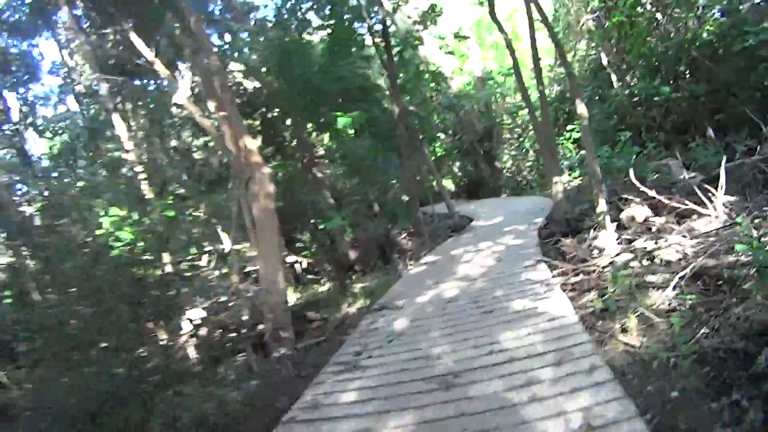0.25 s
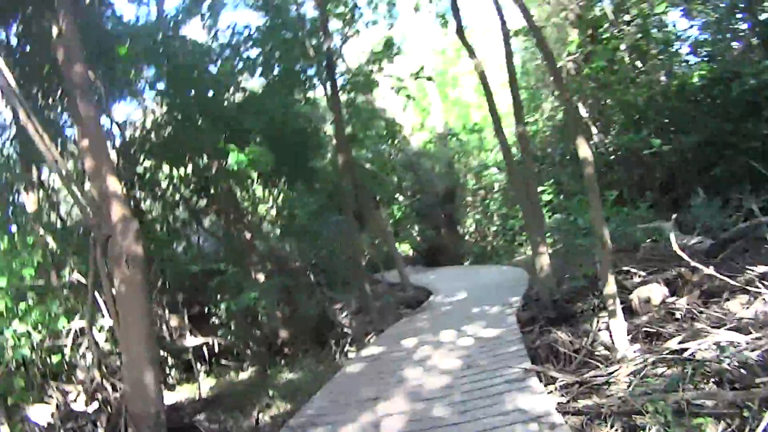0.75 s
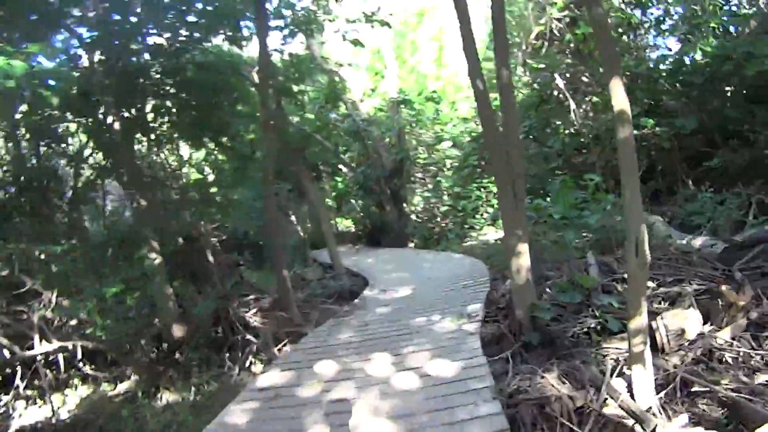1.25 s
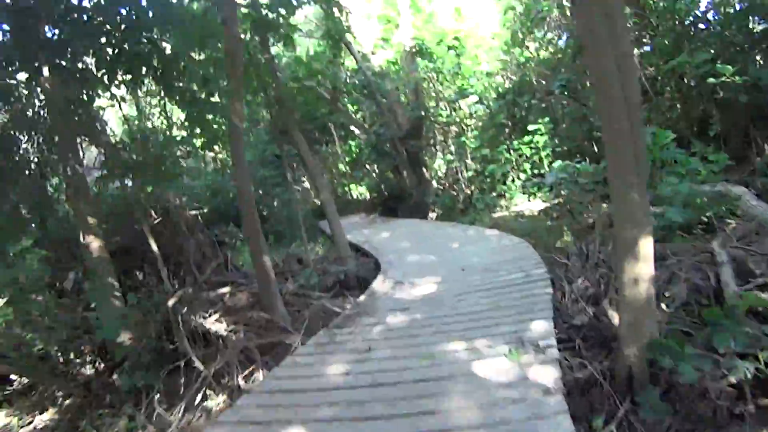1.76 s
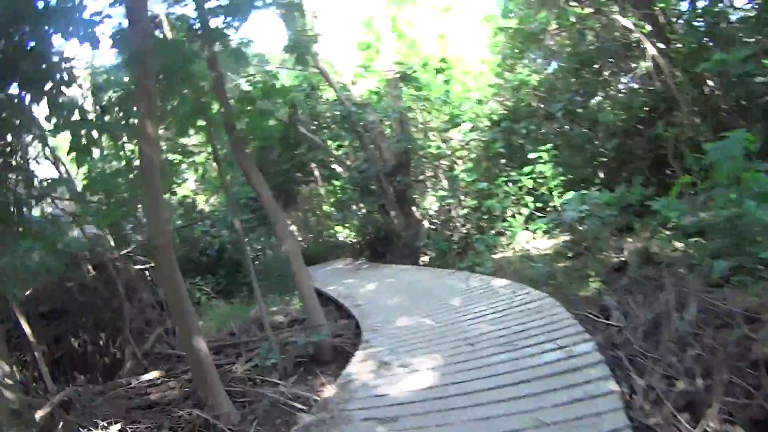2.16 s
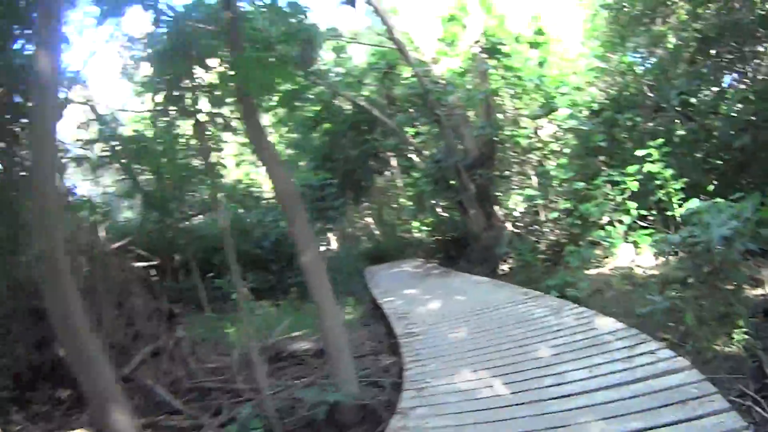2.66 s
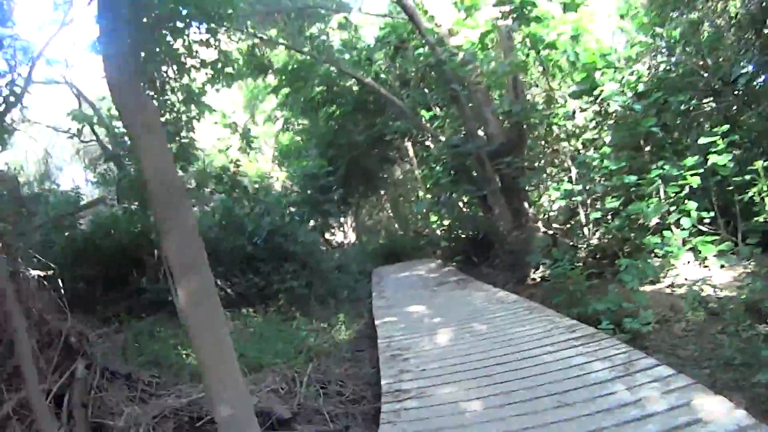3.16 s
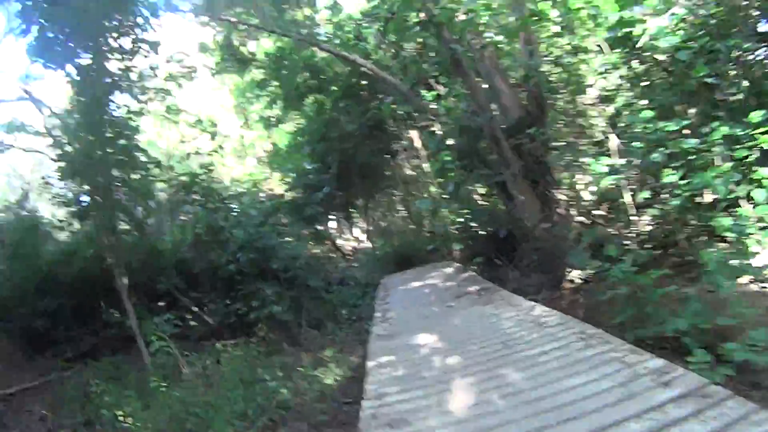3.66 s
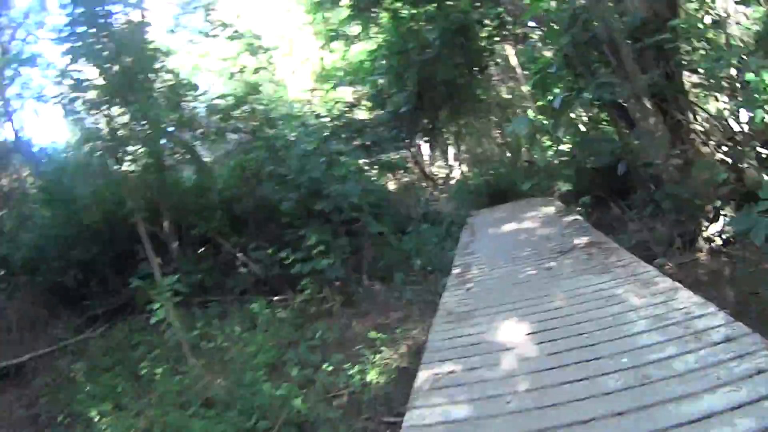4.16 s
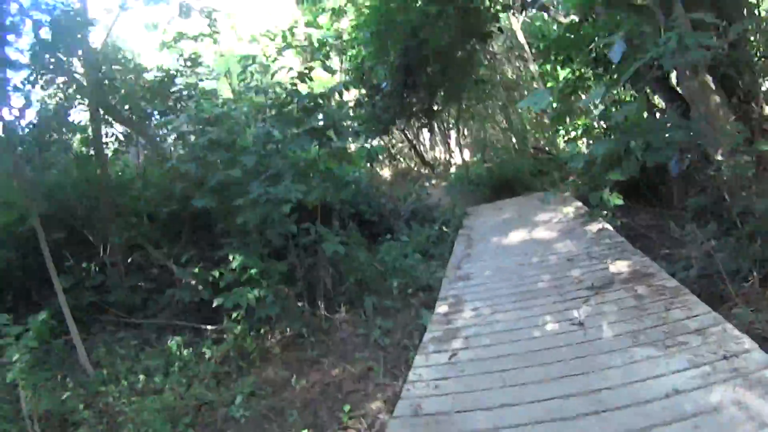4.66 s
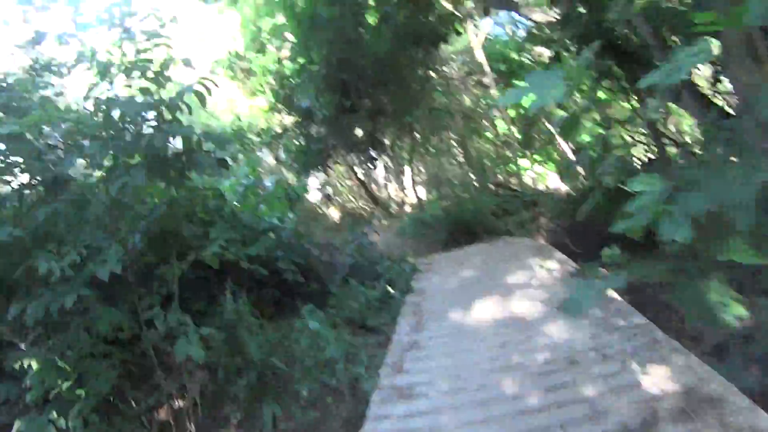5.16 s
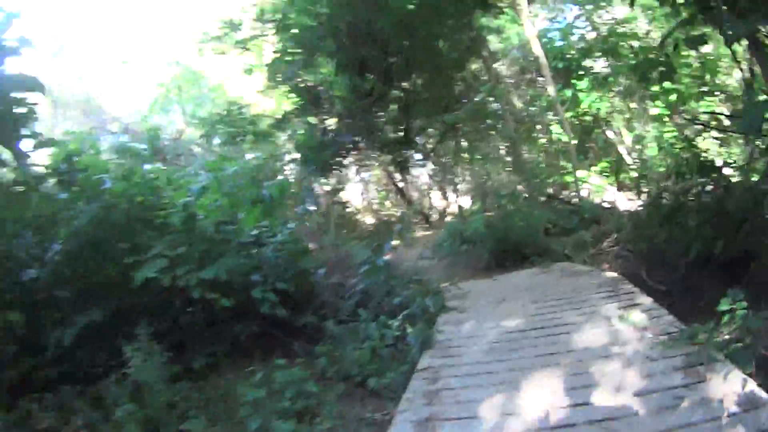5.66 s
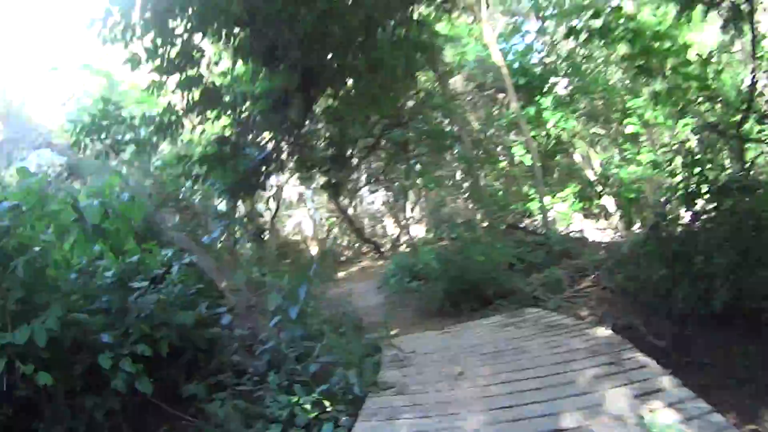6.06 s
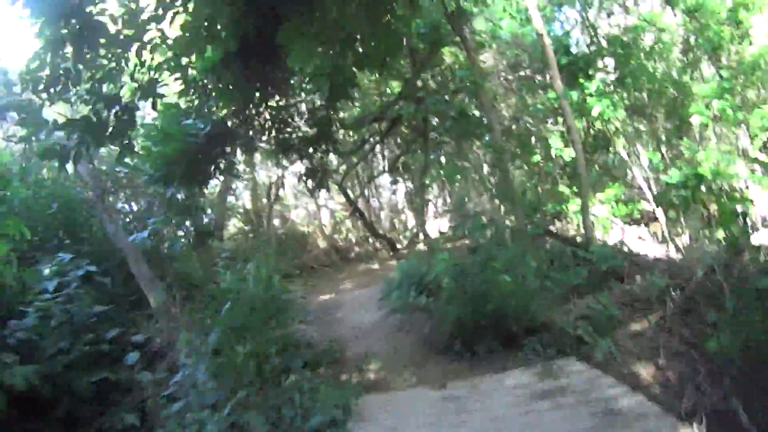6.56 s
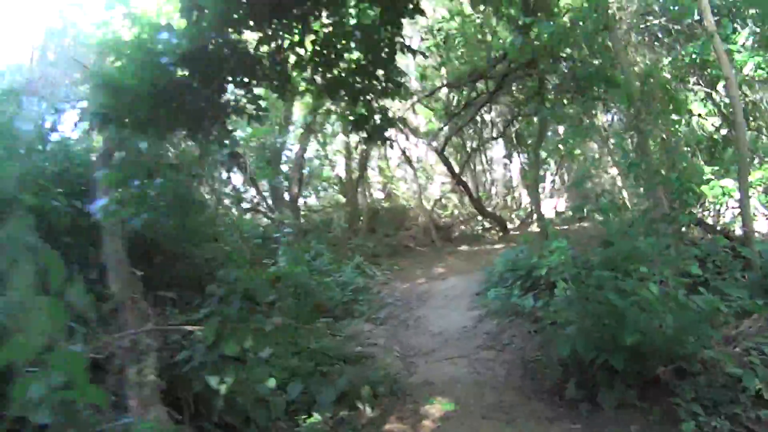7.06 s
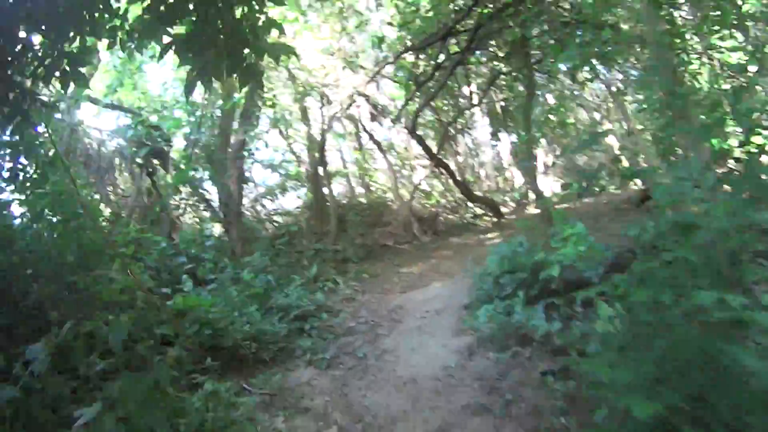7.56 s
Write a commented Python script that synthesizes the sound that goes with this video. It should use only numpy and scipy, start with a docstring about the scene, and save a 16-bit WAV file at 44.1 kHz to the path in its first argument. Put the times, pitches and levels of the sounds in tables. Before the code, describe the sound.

Microphones carried by a runner on a plank path in the woods catch quick, irregular dry knocks, soft low thuds and small clicks. Air rumbles gently, leaves hiss faintly, and distant birds twitter throughout. One loud crack strikes just before four and a half seconds; then a nearer bird whistles short slurred notes between about five and seven seconds as the footfalls continue.

```python
"""A plank walk through a wood, heard by a runner carrying microphones: struck modes make dry knocks of wood and
gear, single swings make small clicks and dull footfall thuds, short tones with noise make sharp ticks.
Shaped noise gives low buffeting of air, a faint hiss of leaves and swishes of clothing.
Gliding sines give one near bird's slurred whistles and farther birds; echoes blur others into a chorus."""
import sys
import numpy as np
from scipy import signal
from scipy.fft import rfft, irfft, next_fast_len
from scipy.io import wavfile
from scipy.ndimage import uniform_filter1d, map_coordinates

SR = 44100
rng = np.random.default_rng(int(sys.argv[2]) if len(sys.argv) > 2 else 0)


def file_out(sig):
    """Save sig as 16-bit WAV at sys.argv[1]."""
    # one column per channel
    cols = np.atleast_2d(sig).T
    # limit, then scale
    lim = np.clip(cols, -1, 1)
    pcm = np.round(lim * 32767).astype(np.int16)
    wavfile.write(sys.argv[1], SR, pcm)


N = 344641

# buffeting of air [t/s, relative level/dB]
BUFFET_LEVEL = [(0.0, -43.5), (0.85, -47), (0.96, -42.5), (2.33, -42.5), (2.48, -47.5), (2.61, -38),
                (2.85, -46.5), (3.02, -43), (3.78, -50), (4.18, -41), (4.2, -55), (4.65, -46), (4.98, -42),
                (5.0, -48.5), (5.29, -42.5), (5.44, -47.5), (5.79, -41), (5.83, -48), (6.11, -42.5),
                (6.15, -44.5), (6.24, -46), (6.65, -41.5), (7.64, -48.5), (7.81, -42.5)]
# buffeting spectrum [f/Hz, relative density/dB per Hz]
BUFFET_SPECTRUM = [(7.1, 9.5), (12, 3.5), (45, -0.5), (119, -10), (308, -25), (500, -31), (650, -36),
                   (1100, -120)]
# leaf hiss spectrum [f/Hz, relative density/dB per Hz]
LEAF_SPECTRUM = [(150, -4), (400, 5.5), (1000, 7), (1800, 6), (3500, -8), (6000, 4), (8000, -0.5),
                 (9000, -10), (9700, -3), (11200, -9.5)]
# leaf hiss, left-right likeness [f/Hz, correlation]
LEAF_LIKENESS = [(60, 0.95), (140, 0.79), (350, 0), (830, -0.0), (1990, 0), (4770, 0.65), (11400, 0.41)]
# distant birds [t/s, relative level/dB]
CHORUS_LEVEL = [(0.0, -45), (0.65, -47), (0.96, -41.5), (1.17, -46.5), (2.2, -46.5), (2.61, -41),
                (2.78, -46.5), (3.22, -46.5), (3.44, -43.5), (4.18, -47), (5.0, -45), (5.55, -43),
                (5.68, -36.5), (5.98, -43), (6.61, -38), (6.76, -43.5), (7.09, -43.5), (7.24, -48.5),
                (7.64, -43.5), (7.81, -43.5)]
# distant birds' spectrum [f/Hz, relative density/dB per Hz]
CHORUS_SPECTRUM = [(1750, -61.5), (2000, -11), (2250, -5.5), (2500, 3.5), (2900, 1), (3300, -1),
                   (5000, -5.5), (5500, -10.5), (6300, -13.5), (8000, -17.5), (11000, -27)]
# echo decay among the trunks [f/Hz, t60/s]
ECHO_DECAY = [(300, 0.085), (1500, 0.077), (3000, 0.378), (5000, 0.41), (9000, 0.2)]
# farther birds [t/s, length/s, first f/Hz, last f/Hz, relative level/dB, warble depth/Hz]
FAR_NOTES = [(0.009, 0.0302, 2724, 2710, -45, 114), (0.583, 0.12, 5128, 5260, -45, 54),
             (0.605, 0.183, 2400, 2410, -46, 163), (0.708, 0.078, 3720, 3751, -49, 70),
             (0.875, 0.14, 2340, 2375, -46.5, 74), (.93, 0.0606, 3860, 3910, -45, 10),
             (1.06, 0.067, 3920, 3430, -46, 15), (1.344, .13, 3300, 3200, -48.5, 34),
             (1.403, 0.16, 2700, 2770, -45, 130), (1.434, 0.056, 4590, 4790, -43.5, 280),
             (1.578, 0.1145, 4250, 4408, -47, 190), (1.606, 0.139, 3910, 3124, -47.5, 20),
             (1.765, 0.08, 4150, 4400, -43, 150), (1.799, 0.109, 4050, 3879, -46.5, 34),
             (1.94, 0.11, 4080, 4240, -43, 118), (2.126, 0.09, 4000, 4326, -42.5, 115),
             (2.351, .1, 4014, 3405, -45.5, 185), (2.403, 0.1825, 2840, 2680, -44.5, 183),
             (2.674, 0.09, 3250, 2750, -40, 192), (2.814, 0.13, 3150, 2700, -42, 210),
             (2.998, .08, 6300, 6000, -52, 470), (3.159, 0.16, 3111, 2670, -46, 225),
             (3.428, 0.114, 4800, 4680, -53, 220), (3.619, 0.16, 7440, 7360, -56, 410),
             (4.05, 0.298, 2945, 2744, -47, 244), (4.36, 0.083, 2400, 2394, -48, 81),
             (4.535, 0.0434, 2950, 3230, -45, 11), (4.591, 0.053, 3300, 3064, -39, 10),
             (4.579, 0.143, 4850, 4677, -50.5, 254), (4.698, 0.074, 8200, 8250, -55.5, 130),
             (4.722, 0.063, 7150, 7250, -54, 130), (4.728, 0.0397, 4400, 4270, -44.5, 120),
             (4.756, 0.0932, 3677, 3690, -47.5, 24), (4.872, 0.0176, 3280, 3250, -39, 30),
             (4.994, 0.088, 5177, 4970, -48, 112), (5.033, 0.058, 3910, 3860, -44.5, 74),
             (5.215, 0.029, 2483, 3293, -42, 20), (5.238, .06, 3230, 3320, -52, 20),
             (5.484, 0.06, 2630, 2629, -36.5, 134), (6.072, 0.0165, 3660, 3204, -34, 22.6),
             (5.288, 0.0707, 2495, 2358, -45.5, 27), (6.89, 0.1, 5500, 4990, -47, 360),
             (6.947, 0.086, 4245, 4301, -44, 141), (7.434, 0.134, 7700, 7700, -51, 132),
             (7.446, 0.129, 6930, 6850, -50.5, 630), (7.444, 0.1367, 4210, 3588, -44.5, 224),
             (7.494, 0.1365, 3016, 2805, -40, 276)]
# knocks [t/s, relative level/dB, landing place/dB from hollow modes to middle one, hardness/dB per octave]
KNOCK_BLOWS = [(0.029, -48, 3.5, 10), (0.113, -45, 3.5, 5.5), (0.1371, -41.5, 0.5, 10.5),
               (0.2949, -35, -0.5, 7.5), (0.3084, -42.5, 5, 12.0), (0.3811, -39, 4.5, 10.5),
               (0.4868, -48, -6.5, -3), (0.5279, -42.0, 1.5, 11), (0.66, -47.5, 1.5, -2),
               (0.7748, -36, 1.5, 4.5), (0.8797, -35.5, -1.5, 10), (1.0088, -38.5, -1.5, 5.5),
               (1.0572, -39.5, -1.5, 2.5), (1.0677, -45.5, -4.5, -1), (1.0831, -33.5, 3.5, 2),
               (1.1602, -36, -6, 7), (1.4725, -42.5, 3.5, -1), (1.5843, -31.0, -1.5, 15),
               (1.7305, -55, 3, 30), (1.7932, -48.0, 3, 12), (1.8181, -58.5, -0.5, -10.0),
               (1.8364, -34, 3.5, 2.5), (1.9758, -45.5, -4.5, -1.0), (1.9825, -49, -3.5, -5),
               (2.1306, -40, -2.5, 6.5), (2.1586, -45, -2, -2), (2.2663, -49.5, -3.5, 5),
               (2.3021, -38, 0, 7), (2.5106, -38, 0.5, 7), (2.5547, -34.5, 1, 1.5), (2.5629, -32.5, 0, 1),
               (2.5874, -42.5, 7.0, 5), (2.6241, -39, 1, 1), (2.6452, -34.5, -4, 2.5),
               (2.901, -45.5, 1.5, -4.5), (2.9338, -45, 0.5, 6.5), (2.987, -52.5, 5, 1),
               (3.0623, -43.5, 5.5, 3.0), (3.3174, -37, -5, 5.0), (3.4408, -43.5, 2, -4),
               (3.476, -50, -2.5, -4), (3.5473, -53, -2, -5.5), (3.655, -51, 3, -5),
               (3.7732, -41, 3.5, 4.5), (3.8729, -53.5, 0.5, -8), (4.2464, -39.5, -8.5, 5.5),
               (4.2583, -48, -3.0, -3), (4.435, -53, -1, 0.5), (4.4722, -23, 1.5, 10.5),
               (4.5247, -43.5, 3.5, -2), (4.8737, -46.5, -4, 12.5), (4.8819, -35.5, 0.5, 7),
               (4.925, -48.5, 1, 11), (5.2068, -35.5, -7, 8), (5.2503, -45, 2, -1), (5.2655, -35, 2, 3.0),
               (5.306, -41.5, -1, 14), (5.3319, -49, -1, 4), (5.3495, -45, -2, 16), (5.5201, -46.5, 1, 23),
               (5.5491, -47.5, 5, 6), (5.5894, -35.5, -1.0, 6), (5.628, -42.5, 6, 1),
               (5.6942, -34, -1.5, 1), (5.7653, -40.0, -1.5, 0), (5.7755, -41, -3.5, 2),
               (6.0114, -38, 3.5, -2), (6.1054, -49, 8, 8), (6.1557, -47.0, 3, 9.0), (6.1709, -46, 0, -3),
               (6.2849, -47, -2.5, -4), (6.425, -36.5, 1.5, 9.5), (6.4449, -39.5, -3.5, 0),
               (6.4573, -42, -3.0, -2), (6.6206, -52, -3.5, -7), (6.6496, -45, 2, 15),
               (6.8202, -44.0, 4, 1), (7.0431, -35.5, 3.5, 7), (7.1355, -48, 0.5, 2.5),
               (7.2628, -37, -4, 4.5), (7.2757, -46, -4.5, -4), (7.527, -50, -1.5, -8),
               (7.576, -37, 3.5, -1)]
# what a knock rings with [f/Hz, t60/s, relative level/dB, left-right/dB, gain/dB per dB of landing place]
RINGING_MODES = [(725.6, 0.0211, 0.5, 1, -1.38), (1108, 0.016, -1, 3.5, 1.81),
                 (1476, 0.013, 2.5, -0.5, -0.91), (2210, 0.0062, 1, 3.5, -0.13)]
# left lead of near blows [f/Hz, phase/rad]
LEFT_LEAD = [(40, .1), (200, 0.66), (700, 1), (1100, 1), (1500, 1), (2400, 0.13), (4000, .05)]
# soft blows [t/s, relative level/dB, f of the one swing/Hz]
THUD_BLOWS = [(0.17, -39.5, 330), (0.25, -35, 110), (0.381, -38.5, 397), (0.487, -55, 440),
              (0.86, -40, 220), (1.093, -32.5, 230), (1.273, -25.5, 267), (1.378, -38, 150),
              (1.397, -36.5, 137), (1.692, -34, 128), (1.821, -28.5, 260), (1.838, -38, 440),
              (1.879, -34, 139), (2.002, -39, 137), (2.035, -36, 127), (2.289, -35.5, 268),
              (2.46, -35.5, 193), (2.511, -34.5, 445), (2.534, -41, 141), (2.615, -40, 190),
              (2.657, -39, 450), (2.754, -32.5, 250), (2.824, -37, 230), (3.024, -42, 179),
              (3.452, -39, 200), (3.548, -30.5, 248), (3.609, -37.5, 158), (3.668, -42, 189),
              (3.694, -37, 158), (3.873, -36.5, 222), (3.907, -37, 140), (4.108, -35.5, 255),
              (4.473, -16.5, 463), (4.652, -36.5, 210), (4.678, -31, 155), (4.751, -30, 180),
              (4.82, -39, 178), (5.043, -40, 208), (5.209, -32, 357), (5.339, -34.5, 199),
              (5.375, -35, 189), (5.394, -37.5, 200), (5.603, -32.5, 217), (5.817, -39, 190),
              (6.145, -30, 140), (6.169, -39.5, 232), (6.19, -30, 201), (6.558, -30.5, 165),
              (6.592, -28, 256), (6.623, -26, 218), (6.986, -37.5, 200), (7.197, -32, 190),
              (7.774, -35, 172)]
# clothing swishes [t/s, relative level/dB]
SWISH_PUFFS = [(.35, -60), (.9, -54), (1.5, -55.5), (1.9, -61), (2.5, -56), (3.05, -59), (3.6, -55),
               (4.7, -58), (5.3, -54.5), (5.72, -53), (6.45, -54), (6.92, -57), (7.52, -57)]
# swish spectrum [f/Hz, relative density/dB per Hz]
CLOTH_SPECTRUM = [(3500, -60), (5000, -4), (6500, 2), (8000, -4), (9000, -11), (11200, -14)]
# sharp treble ticks [t/s, relative level/dB, f/Hz, noise share/0-1]
TICK_CONTACTS = [(0.5864, -30, 5200, 0.19), (0.7303, -24, 3660, 0.4), (0.7444, -35, 3730, 0.84),
                 (0.7977, -25, 3660, 0.34), (1.5617, -22.5, 3050, 0.2), (1.5826, -25.5, 4230, 0.24),
                 (1.7603, -25, 4040, 0), (3.6172, -39, 3070, 0.3), (4.358, -34, 3060, 0.72),
                 (4.4721, -13.5, 5520, 0.17), (4.779, -23, 3640, 0), (5.5144, -42, 3000, 0.6),
                 (6.2553, -24, 3100, 0.2)]
# near bird, one list per note, rows [t/s, f/Hz, relative level/dB]
NEAR_NOTES = [
    [(5.243, 5526, -56), (5.258, 5440, -41.5), (5.284, 5343, -34.5), (5.302, 5010, -26.5),
     (5.318, 4586, -48)],
    [(5.487, 3100, -43), (5.497, 2937, -29.5), (5.508, 3001, -45), (5.521, 2942, -30.5), (5.54, 2847, -57)],
    [(5.582, 4780, -33.5), (5.592, 4503, -27.5), (5.614, 4415, -38.5), (5.644, 4356, -31), (5.7, 4380, -37)],
    [(5.708, 4893, -29), (5.734, 4430, -23.5), (5.745, 3720, -29), (5.762, 3640, -44.5)],
    [(5.77, 2450, -33.5), (5.812, 2460, -33), (5.825, 2482, -30.5), (5.855, 2394, -29), (5.875, 2450, -36)],
    [(5.966, 3666, -29.5), (5.975, 3852, -32), (5.987, 4500, -23.5), (6.0, 4100, -34.5),
     (6.025, 3850, -28.5), (6.04, 3712, -30), (6.06, 3647, -24), (6.09, 3684, -31), (6.13, 3567, -49)],
    [(6.178, 3090, -35.5), (6.214, 2990, -27), (6.25, 2950, -31), (6.284, 3238, -27.5), (6.295, 3210, -33)],
    [(6.38, 4064, -33), (6.394, 4040, -25), (6.41, 3720, -21), (6.424, 3510, -24.5), (6.45, 3432, -19),
     (6.47, 3468, -31), (6.476, 3400, -37)],
    [(6.598, 3770, -41.5), (6.607, 3630, -28), (6.63, 3273, -32.5), (6.65, 3159, -24), (6.666, 2940, -29)],
    [(6.675, 2610, -25), (6.688, 2610, -30), (6.715, 2762, -34.5), (6.749, 2776, -31), (6.769, 2760, -45),
     (6.89, 2757, -44)],
]
# near bird, one value per note [pitch warble depth/Hz]
NEAR_WARBLE_HZ = [32, 62, 80, 50, 60, 33, 61.5, 21.7, 40, 50]

GUST_DB, JOLT_DB, JOLT_S = 1, 24.5, 0.05  # gust depth; gain from thud to air jolt; half length
HISS_DB, HISS_SWAY_DB = -54, 1
TILT_CENTRE_HZ = 1300  # hardness tilts the modes about this
REBOUND_S, REBOUND_DB, REBOUND_DULL_DB_PER_OCT = 0.008, -13.5, -6  # mean delay, mean gain, change of hardness
FAINT_DB, FAINT_SPREAD_DB, FAINT_PLACE_SPREAD_DB, FAINT_HARD_DB_PER_OCT = -52, 2, 2.5, 8
SOFT_THUD_BASE_DB, SOFT_THUD_BASE_HZ = -42.5, 172
SWISH_S = 0.1  # half length
TICK_TOP_HZ = 8500
TOP_HZ = 11070


def amp(db):
    """Gain of a level in dB."""
    return 10 ** (np.asarray(db) / 20)


def unit(x):
    """x at rms 1."""
    return x / np.sqrt(np.mean(x ** 2) + 1e-20)


def along(points, hz):
    """Interpolate (Hz, value) points on a log frequency axis."""
    point_hz, values = np.transpose(points)
    return np.interp(np.log(hz + 1), np.log(point_hz + 1), values)


def curve(rows):
    """Interpolate (s, value) rows to one value per sample."""
    s, values = np.transpose(rows)
    return np.interp(np.arange(N) / SR, s, values)


def wobble(rate_hz, size=N):
    """Smooth random curve, rate_hz knots per second."""
    knots = rng.standard_normal(size // 40 + 4)
    return map_coordinates(knots, [np.arange(size) * rate_hz / SR], mode="wrap")


def add(track, s, sound):
    """Mix a sound into the track from s on, not before 0."""
    part = track[..., max(round(s * SR), 0):][..., :sound.shape[-1]]
    part += sound[..., :part.shape[-1]]


def filtered(x, response):
    """Multiply the spectrum of x by a response of frequency."""
    size = next_fast_len(N + 8192)
    return irfft(rfft(x, size) * response(np.fft.rfftfreq(size, 1 / SR)), size)[..., :N]


def rush(spectrum, alike, patchy_db):
    """Shaped stereo noise of rms 1 whose time-frequency patches vary randomly in gain."""
    z = signal.stft(rng.standard_normal((2, N)), nperseg=512)[2]
    field = uniform_filter1d(rng.standard_normal(z.shape[1:]), size=5, axis=0)
    field = uniform_filter1d(field, size=12, axis=1)
    pair = signal.istft(z * amp(patchy_db * unit(field)), nperseg=512)[1][:, :N]

    def mid_side(hz):
        turn = np.arccos(np.clip(along(alike, hz), -1, 1)) / 2
        return amp(along(spectrum, hz)) * [np.cos(turn), np.sin(turn)]

    mid, side = filtered(pair, mid_side)
    return unit(np.array([mid + side, mid - side]))


def trees(x, alike):
    """Scattered echoes as decaying noise, drawn anew every third of a second because the listener moves."""
    out, step = np.zeros((2, N)), SR // 3
    turn = np.arccos(np.clip(alike, 0, 1)) / 2
    for start in range(0, N, step):
        hz, t, z = signal.stft(rng.standard_normal((2, SR // 2)), SR, nperseg=256)
        decay = amp(-60 * t / along(ECHO_DECAY, hz)[:, None])
        mid, side = signal.istft(z * decay, SR, nperseg=256)[1]
        tail = np.cos(turn) * mid + np.outer([1, -1], np.sin(turn) * side)
        echo = signal.fftconvolve(x[None, start:start + step], tail / np.linalg.norm(mid), axes=1)
        add(out, start / SR, echo)
    return out


def whistle(hz, db):
    """Pure tone of the given rms level with 3.9 ms ramps at its ends."""
    index = np.arange(len(hz))
    ends = np.minimum(index, index[::-1]) / (0.0039 * SR)
    phase = 2 * np.pi * np.cumsum(hz) / SR
    return np.sqrt(2) * amp(db) * np.minimum(ends, 1) * np.sin(phase)


def buffeting():
    """Air pushed over the microphones by the run: gusty rumble, lumpy upper part, swelling at listed thuds."""
    t = np.arange(N) / SR
    jolts = sum(amp(db + JOLT_DB) * np.exp(-((t - s) / JOLT_S) ** 2) for s, db, _ in THUD_BLOWS)
    likeness = [(25, 0.96), (60, 1.0), (125, 0.897), (300, 0.077)]  # f/Hz, correlation
    rumble = rush(BUFFET_SPECTRUM, likeness, patchy_db=-0.08)
    upper = filtered(rumble, lambda hz: hz ** 2 / (hz ** 2 + 70 ** 2))
    lumps_db = 2.0 + np.minimum(4 * wobble(17) + 4.6 * wobble(35), 8)
    swell = amp(curve(BUFFET_LEVEL) + 1.5 + GUST_DB * wobble(7)) * (1 + np.tanh(jolts))
    return swell * (rumble - upper + upper * amp(lumps_db))


def leaves():
    """Leaf hiss all round: patchy wide noise with a slowly swaying level."""
    return amp(HISS_DB + HISS_SWAY_DB * wobble(6)) * rush(LEAF_SPECTRUM, LEAF_LIKENESS, patchy_db=2.83)


def chorus(count=1100):
    """Many distant gliding notes overlap as echo alone, over a haze of noise of like spectrum."""
    out, u = np.zeros(N), np.linspace(0, 1, SR // 16)
    for when, pitch, glide, size in rng.random((count, 4)):
        hz = 2100 * (6000 / 2100) ** pitch * (1 + 0.2974 * (glide - 0.6) * u)
        add(out, when * N / SR, whistle(hz, 5 * size) * np.sin(np.pi * u))
    echoes = filtered(trees(out, alike=0.45), lambda hz: amp(along(CHORUS_SPECTRUM, hz)))
    haze = rush(CHORUS_SPECTRUM, [(3000, 0.8)], patchy_db=1.3)
    return amp(curve(CHORUS_LEVEL)) * (0.6 * unit(echoes) + 0.8 * haze)


def far_birds():
    """Glides and warbles; the wider the warble, the more the note throbs and the more of it is echo."""
    clear, blurred = np.zeros((2, N))
    for s, length_s, first_hz, last_hz, db, warble_hz in FAR_NOTES:
        u = np.linspace(0, 1, round(length_s * SR))
        wide = warble_hz / (warble_hz + 150)
        hz = first_hz + (last_hz - first_hz) * u + warble_hz * wobble(600, len(u))
        throb_db = (1.6 + 2.7 * wide) * wobble(58.4, len(u))
        note = whistle(hz, db + throb_db) * np.sin(np.pi * u) ** 0.1
        add(clear, s, np.sqrt(1 - wide) * note)
        add(blurred, s, (0.39 + 0.79 * wide) * note)
    return amp(-2.0) * clear + amp(-2.0) * trees(blurred, alike=0.55)


def all_blows():
    """Listed knocks, one weaker, duller rebound of each, and one faint knock near each."""
    count = len(KNOCK_BLOWS)
    blows = list(KNOCK_BLOWS)
    for (s, db, place, hard), (a, b) in zip(KNOCK_BLOWS, rng.standard_normal((count, 2))):
        delay_s = REBOUND_S * (1 + 0.3019 * a)
        blows.append((s + delay_s, db + REBOUND_DB + 4 * b, place, hard + REBOUND_DULL_DB_PER_OCT))
    for (s, *_), (a, b, c, d) in zip(KNOCK_BLOWS, rng.standard_normal((count, 4))):
        faint_db = FAINT_DB + FAINT_SPREAD_DB * b
        blows.append((s + 0.07 * a, faint_db, FAINT_PLACE_SPREAD_DB * c, FAINT_HARD_DB_PER_OCT * (1 + d)))
    return blows


def knocks():
    """Each blow rings the same few modes, weighted by landing place and hardness, with a gritty rattle."""
    out, t = np.zeros((2, N)), np.arange(SR // 20) / SR
    hz, t60_s, mode_db, pan_db, place_gain = np.transpose(RINGING_MODES)[:, :, None]
    blows = all_blows()
    chance = rng.standard_normal((len(blows), 4, len(hz), 1))
    for (s, db, place, hard), (detune, turn, tilt, skew) in zip(blows, chance):
        blow_db = db + place_gain * place + hard * np.log2(hz / TILT_CENTRE_HZ)
        onset = 1 - np.exp(-t / 0.00016)
        size = amp(blow_db + 5.5 + mode_db - 60 * t / t60_s) * onset
        grit = rng.standard_normal(len(t) // 45 + 1).repeat(45)[:len(t)]
        size = size * (1 + 0.5 * (t > 0.002) * grit)  # loose parts chatter
        phase = 2 * np.pi * hz * (1 + 0.053 * detune) * t + 1.03 * turn
        for side, track in zip((1, -1), out):
            pan = amp(side * (pan_db + 2.5 * tilt) / 2)
            ringing = size * pan * np.sin(phase + side * 0.26 * skew)
            add(track, s - 0.0004, ringing.sum(axis=0))
    return out


def small_knocks(count=900):
    """Faint clicks bunched about the listed knocks: heavily damped swings, broad in pitch."""
    out, t = np.zeros((2, N)), np.arange(SR // 100) / SR
    for near, lag, pitch, size, pan in rng.random((count, 5)):
        hz = 450 * 3.5 ** pitch
        decay = np.exp(-t * hz / 0.53)
        click = amp(-53.5 + 11.3 * size ** 3) * decay * np.sin(2 * np.pi * hz * t)
        s = KNOCK_BLOWS[int(near * len(KNOCK_BLOWS))][0] + 0.16 * (lag - 0.3)
        add(out, s, click * amp(16 * (pan - 0.45) * np.array([[1], [-1]])))
    return out


def thuds(count=22):
    """Soft blows, listed and random: pressure climbs to a sharp crest, swings down and comes slowly back."""
    out, t = np.zeros(N), np.arange(-SR // 50, SR // 20) / SR
    blows = list(THUD_BLOWS)
    for when, size, pitch in rng.random((count, 3)):
        hz = SOFT_THUD_BASE_HZ * 2 ** (1.6 * pitch - 0.5)
        blows.append((when * N / SR, SOFT_THUD_BASE_DB + 4 * size, hz))
    for s, db, hz in blows:
        u = 2 * np.pi * hz * t
        swing = -u * np.exp(-u ** 2 / np.where(u < 0, 1.6, 2.8))
        crest = 0.31 * np.exp(-np.abs(u + 0.99) / 0.24)
        add(out, s + t[0], amp(db + 4) * (swing + crest))
    return out


def swishes():
    """Clothing: soft puffs of treble noise."""
    t = np.arange(N) / SR
    puffs = sum(amp(db) * np.exp(-((t - s) / SWISH_S) ** 2) for s, db in SWISH_PUFFS)
    return puffs * rush(CLOTH_SPECTRUM, [(6000, 0.6)], patchy_db=3)


def ticks():
    """Hard contacts: a very short tone with a spray of noise, slightly louder left than right."""
    out, t = np.zeros(N), np.arange(SR // 100) / SR
    for s, db, hz, share in TICK_CONTACTS:
        # noise centred near 6 kHz
        spray = np.convolve(rng.standard_normal(len(t)), [1, 0.6, -0.8, -0.8], "same")
        tone = np.sin(2 * np.pi * hz * t)
        add(out, s, amp(db - 60 * t / 0.0034) * ((1.2 - share) * tone + share * spray))
    return filtered(out, lambda hz: 1 / (1 + 1j * (hz / TICK_TOP_HZ) ** 3)) * amp([[0.6], [-0.6]])


def near_bird():
    """Slurred whistles with fast pitch warble and throbbing level, direct and echoed."""
    out = np.zeros(N)
    for note, warble_hz in zip(NEAR_NOTES, NEAR_WARBLE_HZ):
        s, hz, db = np.transpose(note)
        t = np.arange(s[0], s[-1], 1 / SR)
        pitch_hz = np.interp(t, s, hz) + warble_hz * wobble(302.0, len(t))
        level_db = np.interp(t, s, db) + 3 * wobble(213.6, len(t))
        add(out, s[0], whistle(pitch_hz, level_db))
    direct = amp(-2.5) * out * amp([[0.2], [-0.2]])
    return direct + amp(-6.0) * trees(out, alike=0.66)


def scene():
    """Sum of all sources; blows lead on the left and get a short answer from planks and trunks."""
    hits = knocks() + small_knocks() + thuds() + ticks()
    hits = filtered(hits, lambda hz: np.exp(0.5j * np.outer([1, -1], along(LEFT_LEAD, hz))))
    answer = amp(-13.5) * trees(hits.mean(axis=0), alike=0.33)
    birds = chorus() + far_birds() + near_bird()
    return buffeting() + leaves() + birds + hits + answer + swishes()


def record(dry):
    """Band limit: nothing passes from TOP_HZ up."""
    return filtered(dry, lambda hz: hz < TOP_HZ)


dry = scene()
out = record(dry)
file_out(out)
```